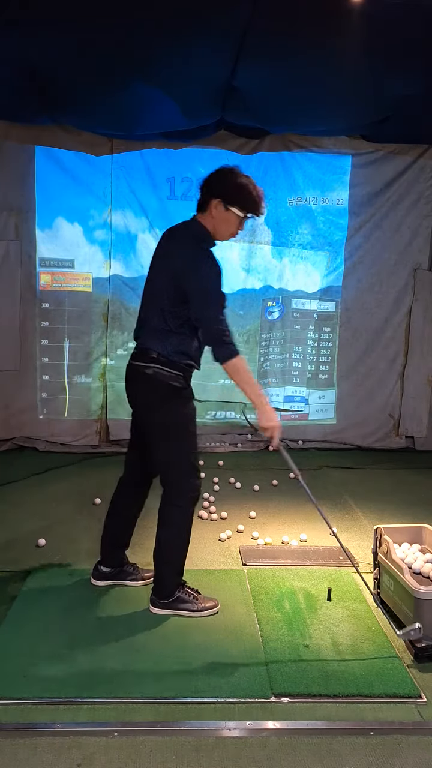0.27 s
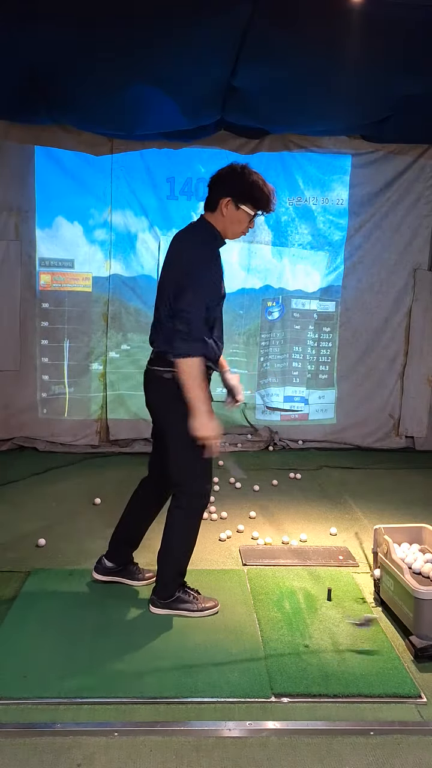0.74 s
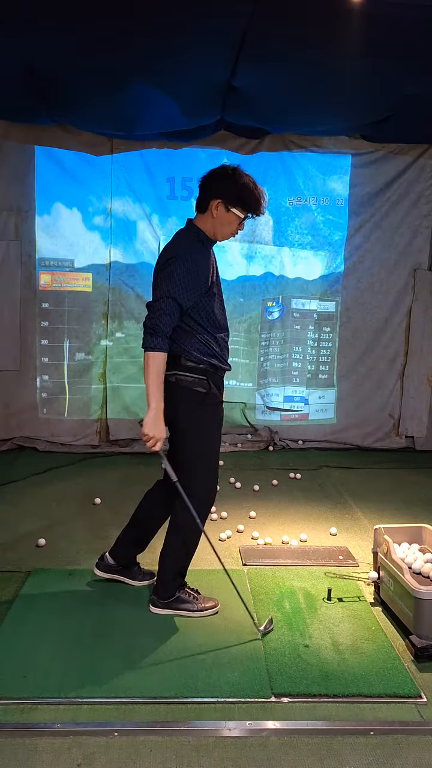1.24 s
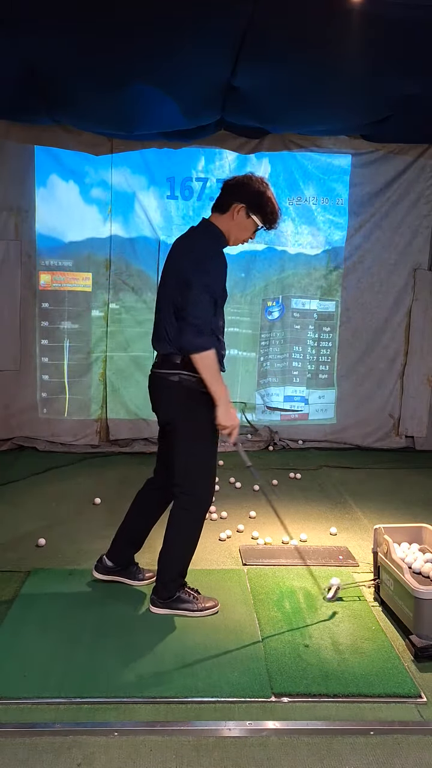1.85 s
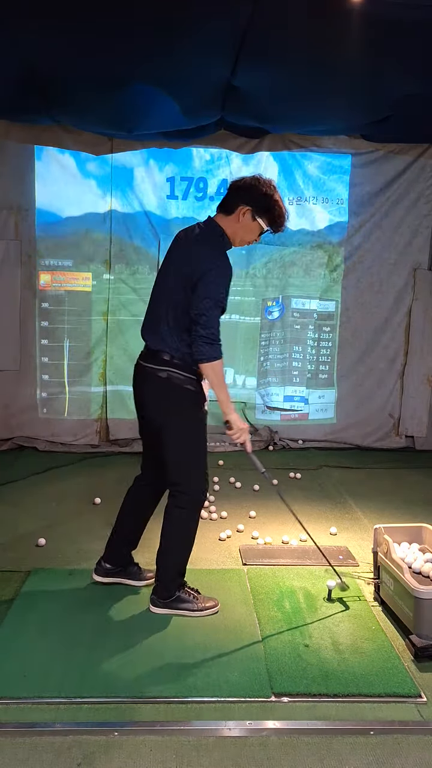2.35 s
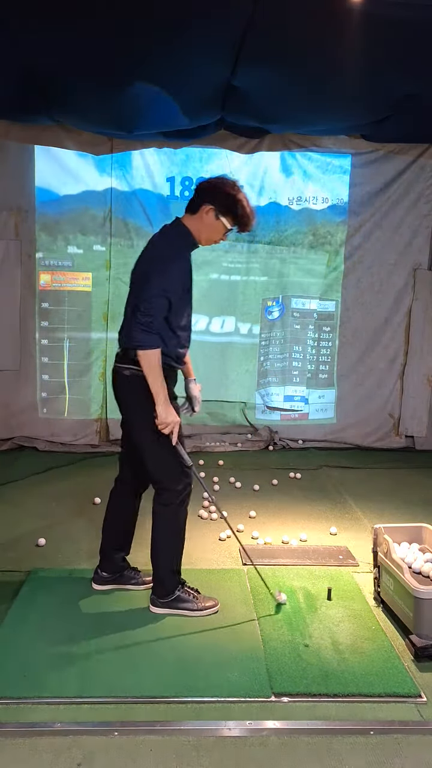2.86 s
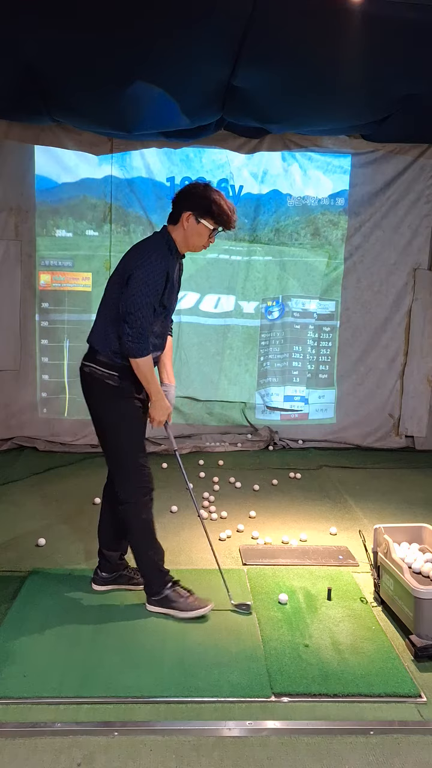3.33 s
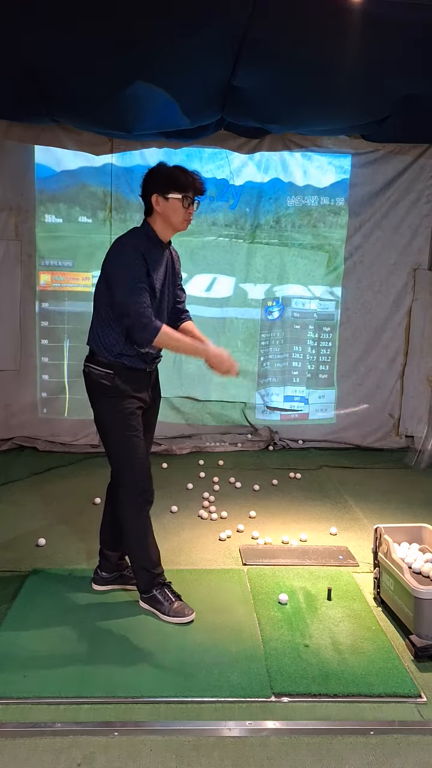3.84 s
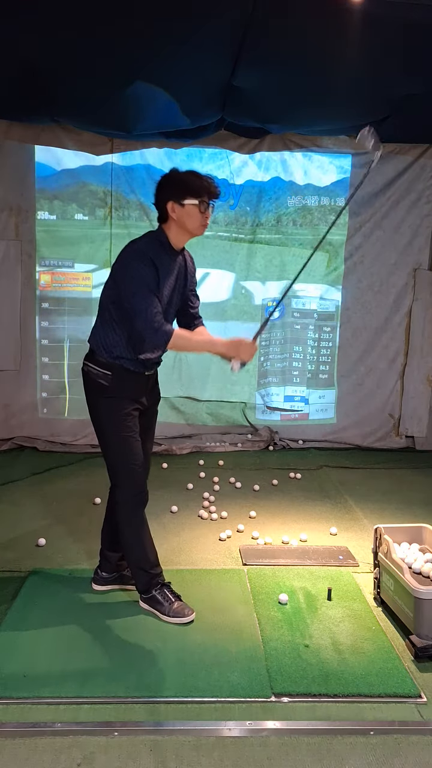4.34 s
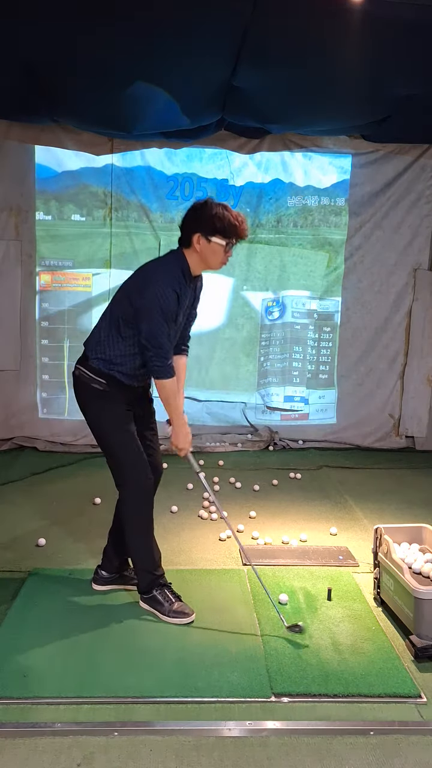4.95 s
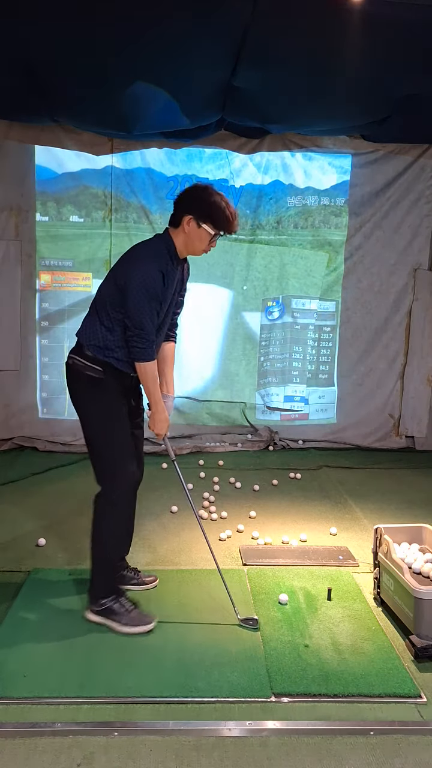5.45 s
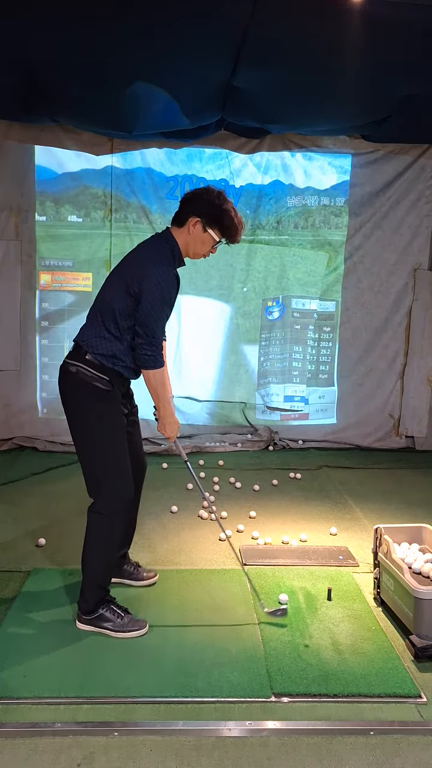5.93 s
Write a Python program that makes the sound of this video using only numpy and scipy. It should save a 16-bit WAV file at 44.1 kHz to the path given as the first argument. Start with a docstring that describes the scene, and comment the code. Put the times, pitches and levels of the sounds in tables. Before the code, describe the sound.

Golf balls clatter in a plastic crate, a tee lift whirs, then a practice swing thumps the mat over steady indoor ventilation.

```python
"""An indoor golf bay: ventilation rushes and a motor hum slowly rises the whole time.
First a club head rakes through a plastic crate of balls, which clack and rumble into the feeder.
Next the tee lift whirs and clacks as it brings a ball up. A faint ping comes as the club swings down.
Last, this practice swing brushes the turf and thumps the mat on its hollow platform,
hard enough to overload the microphone."""
import sys
import numpy as np
from scipy import signal
from scipy.fft import rfft, irfft, next_fast_len
from scipy.io import wavfile
from scipy.ndimage import uniform_filter1d

SR = 44100
rng = np.random.default_rng(int(sys.argv[2]) if len(sys.argv) > 2 else 0)


def materialize(psi):
    """Save the field psi as 16-bit PCM at rate SR to the path in sys.argv[1].

    A 1-D psi becomes a single channel; in a 2-D psi each row is a channel.
    """
    bounded = np.clip(np.atleast_2d(psi).T, -1, 1)
    quanta = np.round(bounded * 32767).astype(np.int16)
    wavfile.write(sys.argv[1], SR, quanta)


N = 272977
TIME = np.arange(N) / SR


def gain_of(db):
    """Turns decibels into a number to multiply a sound by."""
    return np.exp(np.asarray(db) * (np.log(10) / 20))


def evened(x):
    """Scales a signal to an average power of 1."""
    return x / np.sqrt(np.mean(x ** 2) + 1e-20)


def standard_hit(x):
    """Gives a short sound the energy of one millisecond at full scale."""
    return x / np.sqrt(np.sum(x ** 2) * 1000 / SR + 1e-20)


def look_up(table, hz):
    """Reads between the rows of a table, with pitch spaced in octaves."""
    pitches, values = np.transpose(table)
    return np.interp(np.log(hz + 1), np.log(pitches + 1), values)


def add(mix, start_s, sound):
    """Mixes a sound in at the given time."""
    part = mix[..., round(start_s * SR):][..., :sound.shape[-1]]
    part += sound[..., :part.shape[-1]]


def coloured(x, db_at):
    """Turns each pitch up or down by db_at(hz) decibels."""
    count = next_fast_len(x.shape[-1], True)
    gains = gain_of(db_at(np.fft.rfftfreq(count, 1 / SR)))
    return irfft(rfft(x, count) * gains, count)[..., :x.shape[-1]]


def leaned(pair, balance):
    """Shifts each pitch toward the left or the right."""
    return coloured(pair, lambda hz: np.array([[.5], [-.5]]) * look_up(balance, hz))


def drift(hz):
    """A smooth random wobble with up to about hz changes a second."""
    count = 2048
    keep_slow = np.exp(-(np.fft.rfftfreq(count, N / SR / count) / hz) ** 2)
    slow = irfft(rfft(rng.standard_normal(count)) * keep_slow, count)
    return evened(np.interp(np.arange(N) * count / N, np.arange(count), slow))


def pulse(tone, tilt_db=0):
    """One tap with the given tone, brightened by tilt_db per octave around 2 kHz."""
    hz = abs(np.fft.fftfreq(4096, 1 / SR))
    db = np.maximum(look_up(tone, hz), -100) + tilt_db * np.log2(np.maximum(hz, 500) / 2000)
    spectrum = np.exp(np.conj(signal.hilbert(np.log(gain_of(db)))))  # packs the energy at the start
    return standard_hit(np.fft.ifft(spectrum).real[:len(hz) // 2])


def ring(notes, contact_s=0.00035):
    """Ringing notes, each falling 60 dB in fade_s; every blow mixes them a bit differently."""
    t = np.arange(SR // 2) / SR
    ease_in = 1 - np.exp(-(t / contact_s) ** 2)
    ringing = sum(gain_of(db + rng.standard_normal() - 60 * t / fade_s) * np.sin(2 * np.pi * hz * t)
                  for hz, db, fade_s in notes)
    return standard_hit(ease_in * ringing)


def collisions(per_s, spread_db=3.0):
    """A random stream of tiny hits, uneven in size but steady in average power."""
    hits = (rng.random(N) < per_s / SR) * rng.choice([-1., 1.], N)
    hits *= gain_of(spread_db * np.minimum(rng.exponential(1, N), 3))
    return hits / np.sqrt(abs(uniform_filter1d(hits ** 2, size=1300)) + 1e-4)


# How alike left and right sound (1 is identical): pitch_hz, likeness
EAR_LIKENESS = [(50, 0.73), (150, 0.98), (300, 0.8), (550, 0.46), (1000, 0.33), (2000, 0.33), (5000, 0.099),
                (9000, 0.26)]
def from_all_sides(pair):
    """Sound from all around is much alike left and right in the bass, but not in the treble."""
    count = next_fast_len(pair.shape[-1], True)
    first, second = rfft(pair, count)
    likeness = np.clip(look_up(EAR_LIKENESS, np.fft.rfftfreq(count, 1 / SR)), -1, 1)
    shared = first * np.sqrt((1 + likeness) / 2)
    opposed = second * np.sqrt((1 - likeness) / 2)
    return irfft(np.array([shared + opposed, shared - opposed]), count)[:, :pair.shape[-1]]


# How long the bay's echo takes to fall 60 dB: pitch_hz, fade_s
ECHO_FADES = [(100, 0.94), (250, 0.12), (600, 0.39), (1400, 0.46), (3500, 0.35), (6000, 0.37), (9000, 0.17)]
def bay(x, direct_db, echo_db, build_s=0.0014):
    """A sound arrives directly, then bounces off the walls, each pitch fading at its own speed."""
    count = 3 * SR // 4
    bounces = rng.choice([-1., 1.], (2, count)) * (rng.random((2, count)) < 4000 / SR)  # 4000 a second
    hz, t, bands = signal.stft(from_all_sides(bounces), SR, nperseg=256)
    fade = gain_of(-60 * t / look_up(ECHO_FADES, hz)[:, None])
    echo = signal.istft(bands * fade, SR, nperseg=256)[1][:, :count]
    echo *= 1 - np.exp(-TIME[:count] / build_s)
    echo *= 1 + 0.79 * np.exp(-(TIME[:count] / 0.028) ** 2)  # near walls answer first and strongest
    echo *= gain_of(echo_db) / np.sqrt(np.sum(echo ** 2) / 2)
    echo[:, 0] += gain_of(direct_db)
    return signal.fftconvolve(x[None], echo, axes=1)[:, :N]


# Tone of the rushing air: pitch_hz, level_db
AIR_TONE = [(12, -30.5), (25, -18), (42, -11), (52, -8.5), (68, -3), (92, -4), (125, -5.5), (200, -8),
            (260, -12), (440, -14), (600, -19), (2100, -32), (5500, -53), (9600, -80)]
# The air hisses from the left: pitch_hz, left_minus_right_db
HISS_BALANCE = [(2000, 0), (3500, 3), (5300, 3.5), (8000, 2.5)]
# Low drones of the fans: pitch_hz, level_db
FAN_DRONES = [(58.6, -44.5), (116, -54), (239, -54)]
def ventilation(air_db=-41, waver_db=1.0, deep_hz=70, swell_s=3.1, swell_width_s=0.98, swell_db=5.5):
    """Air rushes and fans drone unsteadily; the deepest part slowly swells and sinks once."""
    noise = from_all_sides(rng.standard_normal((2, N)))
    rush = evened(coloured(noise, lambda hz: look_up(AIR_TONE, hz)))
    rush = leaned(rush, HISS_BALANCE) * gain_of(air_db + waver_db * drift(hz=5.4))
    for hz, db in FAN_DRONES:
        turns = np.cumsum(hz * (1 + .02 * drift(hz=6))) / SR
        rush += gain_of(db) * evened(np.sin(2 * np.pi * turns) * (1 + 0.38 * drift(hz=5.7)))
    deep = signal.sosfiltfilt(signal.butter(2, deep_hz, fs=SR, output="sos"), rush)
    swell = gain_of(swell_db * np.exp(-((TIME - swell_s) / swell_width_s) ** 2))
    return rush + deep * (swell - 1)


# Pitches at which the bay booms: pitch_hz, half_width_hz, boost_db
BAY_BOOMS = [(113.5, 3, 7), (133, 3.2, 16.5), (139.8, 1.2, 7)]
def motor_hum(start_hz=112.8, climb_hz_per_s=8.4, level_db=-47, fade_db_per_s=1.5,
              octave_db=-16, flutter_db=2.3):
    """A motor slowly gathers speed; its hum swells as it passes each pitch where the bay booms."""
    hz = start_hz + climb_hz_per_s * TIME
    turns = np.cumsum(hz * (1 + .004 * drift(hz=8))) / SR
    boom_db = sum(db / (1 + ((hz - centre) / width) ** 2) for centre, width, db in BAY_BOOMS)
    tone = evened(np.sin(2 * np.pi * turns) + gain_of(octave_db) * np.sin(4 * np.pi * turns))
    return tone * gain_of(level_db - fade_db_per_s * TIME + boom_db + flutter_db * drift(hz=5))


def gear_whine(noise, hz, width_hz):
    """Gear noise narrowed to a whine around one pitch, which may move."""
    spin = np.exp(2j * np.pi * np.cumsum(hz * np.ones(N)) / SR)
    memory = np.exp(-np.pi * width_hz / SR)
    for _ in range(2):  # twice makes the band sharper
        noise = 2 * (spin * signal.lfilter([1 - memory], [1, -memory], noise / spin)).real
    return evened(noise)


# Tone of a hollow rumble, for the lift housing and the crate floor: pitch_hz, level_db
RUMBLE_TONE = [(40, -46), (90, -18.5), (150, 1), (205, 4.5), (290, -1.5), (400, 3), (520, -8), (650, -11.5),
               (900, -18.5), (2000, -56.5), (5000, -93)]
def tee_lift(on_s=2.18, off_s=3.32, ramp_s=.06, speed_up_s=2.46, step_s=.04,
             lower_hz=3170, upper_start_hz=3440, upper_run_hz=3745, rumble_db=-47):
    """While the tee lift runs, its gears whine at two pitches and its housing rumbles."""
    age = np.clip(TIME, on_s, off_s) - on_s
    running = np.clip(np.minimum(TIME - on_s, off_s - TIME) / ramp_s + .5, 0, 1)
    freed = (1 + np.tanh((TIME - speed_up_s) / step_s)) / 2  # goes from 0 to 1 as the lift runs freely
    upper_hz = upper_start_hz + (upper_run_hz - upper_start_hz) * freed
    teeth = from_all_sides(rng.standard_normal((2, N)))
    lower = gain_of(-65.5 + 7 * age) * gear_whine(teeth, lower_hz, width_hz=180)  # grows as the tee climbs
    upper = gain_of(-59 - 4 * age) * gear_whine(teeth, upper_hz, width_hz=360)
    rumble = evened(signal.oaconvolve(teeth, pulse(RUMBLE_TONE)[None])[:, :N])
    return running * (lower + upper + gain_of(rumble_db) * rumble)


def settling(length_s, fade_db_per_s, rise_s=.011):
    """Motion after a shove: it rises fast, holds while the push lasts, then dies away."""
    age = TIME[:SR]
    return (1 - np.exp(-age / rise_s)) * gain_of(-fade_db_per_s * np.maximum(age - length_s, 0))


# Tone of one hard hit inside the crate: pitch_hz, level_db
HIT_TONE = [(290, -43), (500, -6), (625, 1), (800, -3), (872, -10), (1190, -2), (1660, -9.5), (2020, -7.5),
            (2180, -6), (2620, -11), (4090, -16), (5400, -22.5), (7500, -38), (9610, -56.5), (12500, -76.5),
            (21100, -120)]
# Shoves that set the balls moving: start_s, length_s, clacking_db, rumbling_db
BALL_SHOVES = [(0.348, .04, -24.5, -18), (0.38, 0.017, -20, -12), (0.461, 0.038, -30.5, -26.5),
               (0.522, 0.02, -41, -27.5), (0.634, 0.033, -48, -36), (0.759, .05, -37.5, -26.5),
               (0.838, 0.033, -41, -26), (0.925, .07, -53, -27.5), (1.782, 0.059, -44.5, -34.5),
               (1.897, 0.11, -52.5, -35.5), (2.029, 0.095, -42, -32.5), (2.219, 0.054, -38.5, -29),
               (2.305, 0.067, -62, -35)]
def jostling_balls(level_db=-3):
    """Balls bump together and roll on the crate floor; the rumble outlasts the clacking."""
    hits = collisions(per_s=420)
    bumping, rolling = np.zeros((2, N))
    for start_s, length_s, clacking_db, rumbling_db in BALL_SHOVES:
        add(bumping, start_s, gain_of(clacking_db) * settling(length_s, fade_db_per_s=192))
        add(rolling, start_s, gain_of(rumbling_db) * settling(length_s, fade_db_per_s=111.5))
    clack, rumble = pulse(HIT_TONE), pulse(RUMBLE_TONE)
    clacking = signal.oaconvolve(hits * bumping, clack / np.linalg.norm(clack))[:N]
    rumbling = signal.oaconvolve(hits * rolling, rumble / np.linalg.norm(rumble))[:N]
    out = bay(clacking, direct_db=-12.5, echo_db=-8) + bay(rumbling, direct_db=-7, echo_db=-8)
    return gain_of(level_db) * out


# Ringing pitches that colour each knock in the clatter: pitch_hz, level_db, fade_s
KNOCK_RING = [(149, -20, .3), (211, -1, 0.23), (280.4, 5, 0.19), (373, -8.5, 0.14), (385, 1, 0.35),
              (433, -6.5, 0.17), (604, 10, 0.17), (610, -3.5, 0.066), (727, -3, 0.27), (1158, -10, 0.2),
              (1232, -5, 0.22), (1680, -5, .14), (4130, -11, .07)]
# Knocks on the crate: start_s, hit_db, tilt_db_per_octave, direct_db, ring_db
CRATE_KNOCKS = [(0.348, -12.5, 1, -22, -10.5), (0.367, -2.5, 4.5, -22.5, -1.5),
                (0.394, 4.5, 3.5, -22, -9.5), (0.408, -4.5, 2.5, -11, -3), (0.429, -18, -2.5, -1.5, -1.5),
                (0.437, -5, -8, -2, -13), (0.474, -9.5, 5.5, -23, -13.5), (0.512, -13.5, -1.5, -17, -18.5),
                (0.551, -8, -2, -23, 3), (0.796, -17, -3.5, -22, -13.5), (0.838, -7.5, -4.5, -27, -4.5)]
def crate_knocks():
    """Club and balls knock the crate: each knock is a hard hit with a short ring."""
    out = np.zeros((2, N))
    for start_s, hit_db, tilt_db, direct_db, ring_db in CRATE_KNOCKS:
        add(out, start_s, gain_of(hit_db) * bay(pulse(HIT_TONE, tilt_db), direct_db, echo_db=-10.5))
        add(out, start_s, gain_of(ring_db) * bay(ring(KNOCK_RING), direct_db=-12.5, echo_db=-16))
    return out


# Tone of one sharp clack: pitch_hz, level_db
CLACK_TONE = [(200, -32), (400, -0.5), (560, 2.5), (850, 0), (1100, 2), (1700, -2.5), (2000, -4.5),
              (3500, -12), (4700, -19.5), (5400, -18.5), (6400, -29), (7500, -34), (8400, -39.5),
              (10000, -69), (14000, -111)]
# Notes of the hollow lift housing: pitch_hz, level_db, fade_s
HOUSING_NOTES = [(178, 0, .35), (574, 10.5, 0.072), (681, -0.5, 0.13), (1089, -1.5, 0.1), (1520, -11, 0.15),
                 (1685, -17.5, 0.19)]
# Notes of a golf ball: pitch_hz, level_db, fade_s
BALL_NOTES = [(3480, 1, .014), (3780, 0, .014), (4180, 1, .012), (4800, -8, .014)]
# Each clack: start_s, level_db, housing_db, tilt_db_per_octave, ball_db, direct_db
SINGLE_CLACKS = [(1.731, -35, -12, 1, 1, -17), (1.799, -33, -12, -1.5, -6, -21),
                 (1.821, -33, -11, -4, -6, -22), (1.847, -36, -4, -6, -10, -17),
                 (2.01, -26, -6.5, -4, -8, -9), (2.215, -25, -10, -0.5, -9, -18),
                 (2.255, -26.5, -7, -1.5, -7, -19), (2.864, -13, 2.5, 6.5, -33, -16.5),
                 (2.877, -14, -2, 0, -16, -10.5), (3.335, -17.5, -6.5, -3, -19, -22),
                 (3.349, -23.5, -8, -1, -32, -26), (3.385, -23.5, -11, -2.5, -28, -25),
                 (3.425, -31, -9, -1.5, -22, -25), (3.871, -24.5, -2, 1.3, -24, -20),
                 (5.097, -20, -3.5, -5, -30, -19)]
def clacks():
    """Ball, club and lift clack, ringing the housing and the ball; most of it arrives off the walls."""
    out = np.zeros((2, N))
    for start_s, level_db, housing_db, tilt_db, ball_db, direct_db in SINGLE_CLACKS:
        blow = gain_of(housing_db) * ring(HOUSING_NOTES) + gain_of(ball_db) * ring(BALL_NOTES)
        add(blow, 0, pulse(CLACK_TONE, tilt_db))
        add(out, start_s, gain_of(level_db) * bay(blow, direct_db, echo_db=-6, build_s=.001))
    return out


# Tone of a fine tick, for the turf and the ping: pitch_hz, level_db
TICK_TONE = [(1500, -22), (3000, -16.5), (4600, -9), (5200, -4), (5800, -5.5), (6400, -20), (8000, -29),
             (10000, -43)]
def turf_swish(start_s=4.953, level_db=-42, rise_s=0.0065, fade_s=.025):
    """The club brushes the turf: tiny ticks of its fibres swell and die away fast."""
    age = np.maximum(TIME - start_s, 0)
    stroke = gain_of(level_db) * (1 - np.exp(-age / rise_s)) * np.exp(-age / fade_s)
    fibres = from_all_sides(np.array([collisions(per_s=3500) for side in range(2)]))
    tick = pulse(TICK_TONE)
    return signal.oaconvolve(stroke * fibres, tick[None] / np.linalg.norm(tick))[:, :N]


# Notes of the faint high ping: pitch_hz, level_db, fade_s
PING_NOTES = [(3960, -12, .07), (5240, 0, .024), (5400, -8, .03)]
def ping(start_s=4.617, level_db=-45, tick_db=-3):
    """A light tick with a thin metallic ring as the club comes down."""
    out = np.zeros((2, N))
    blow = ring(PING_NOTES, contact_s=.002)
    add(blow, 0, gain_of(tick_db) * pulse(TICK_TONE, tilt_db=2))
    add(out, start_s, gain_of(level_db) * bay(blow, direct_db=-10, echo_db=-6.5, build_s=.003))
    return out


# Notes of the hollow platform: pitch_hz, level_db, fade_s
PLATFORM_NOTES = [(78, 0, 1), (132, 3, 0.9), (171, -1.5, 0.33), (188.7, 2.5, 0.29), (285, -0.5, 0.72),
                  (425, -13.5, 0.33), (490, 0, 0.34), (519, 2.5, 0.2), (620, -12, 0.27), (660, -12, .28),
                  (1480, -16, .05), (1700, -16, .06)]
# Near walls send the thump back: delay_s, level_db
WALL_ECHOES = [(0.0066, -1.5), (0.0213, -7.5)]
def mat_thump(hit_s=4.950, lead_s=.005, push_s=0.0009, push_db=2.5, platform_db=-7.5, slap_db=-23):
    """The club slaps the mat down and it springs back: one low push, wall echoes, a booming platform."""
    from_peak = (TIME[:round(2 * lead_s * SR)] - lead_s) / push_s
    push = gain_of(push_db) * (2 * from_peak ** 2 - 1) * np.exp(-from_peak ** 2)
    out = np.zeros((2, N))
    add(out, hit_s - lead_s, bay(push, direct_db=0, echo_db=-3, build_s=.02))
    for delay_s, level_db in WALL_ECHOES:
        add(out, hit_s - lead_s + delay_s, gain_of(level_db) * push)
    add(out, hit_s, gain_of(platform_db) * ring(PLATFORM_NOTES))
    add(out, hit_s, gain_of(slap_db) * bay(pulse(CLACK_TONE, tilt_db=-4), direct_db=7, echo_db=1.5))
    return out


def scene():
    """All the sounds together in the bay."""
    return (jostling_balls() + crate_knocks() + clacks() + tee_lift() + motor_hum()
            + ping() + mat_thump() + turf_swish() + ventilation())


def cut_above(pair, hz):
    """Steeply removes everything above a pitch."""
    return signal.oaconvolve(pair, signal.firwin(255, hz, window=("kaiser", 8), fs=SR)[None], "same")


# How the microphone's two sides differ in tone: pitch_hz, left_minus_right_db
MIC_BALANCE = [(60, 1.5), (180, 2.46), (350, 0.5), (520, 0.4), (1000, -0.2), (1700, -1.5), (3000, -1.6),
               (4100, 2.5), (5300, 5), (9000, 4.5)]
def record(dry, treble_hz=9750, top_hz=15700):
    """The microphone colours each side, cuts the high treble and flattens the loudest peaks."""
    heard = leaned(dry, MIC_BALANCE) * signal.windows.tukey(N, .002)  # tiny fades at both ends
    overloaded = np.clip(cut_above(heard, treble_hz), -1, 1)
    return cut_above(overloaded, top_hz)


dry = scene()
out = record(dry)
materialize(out)
```